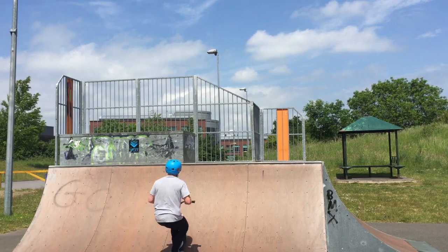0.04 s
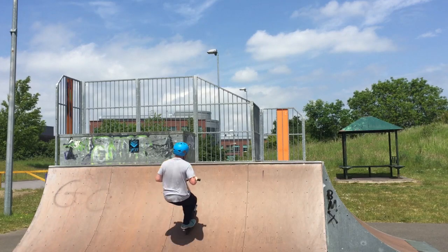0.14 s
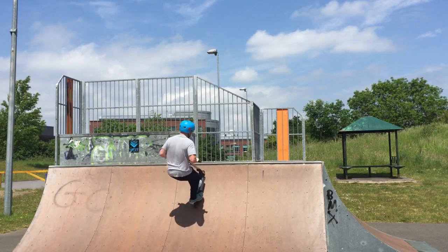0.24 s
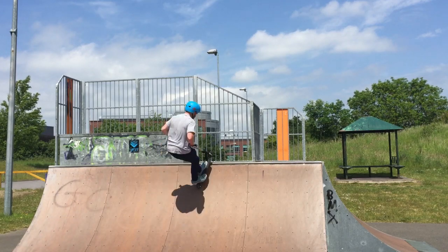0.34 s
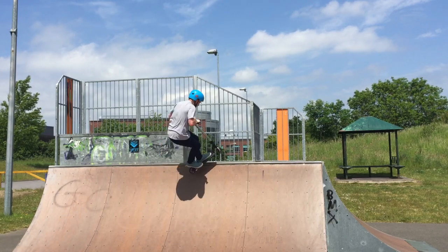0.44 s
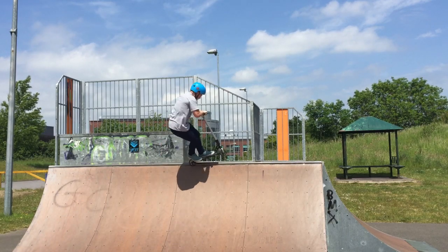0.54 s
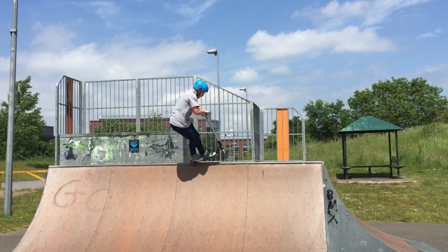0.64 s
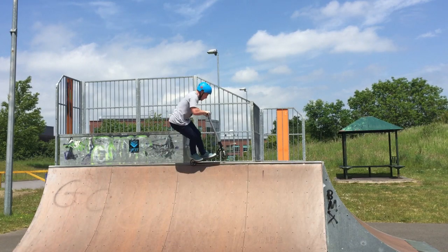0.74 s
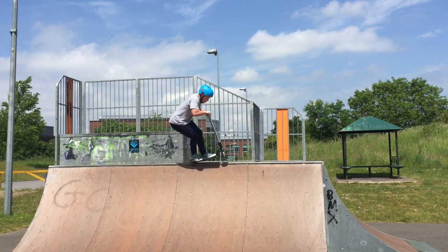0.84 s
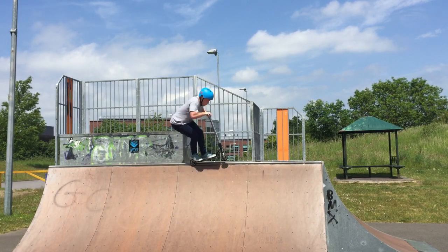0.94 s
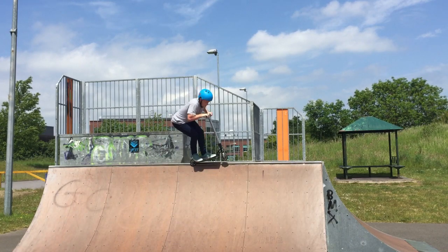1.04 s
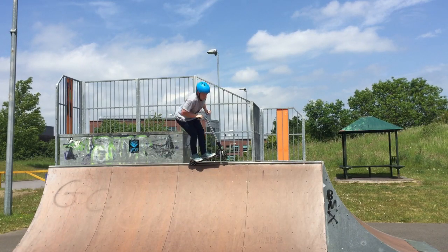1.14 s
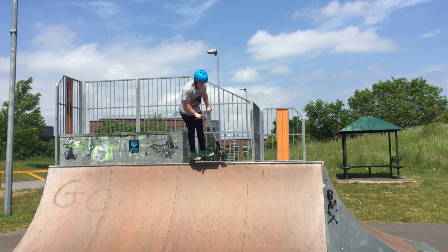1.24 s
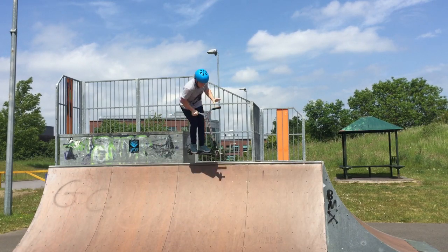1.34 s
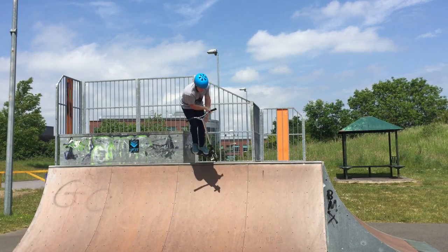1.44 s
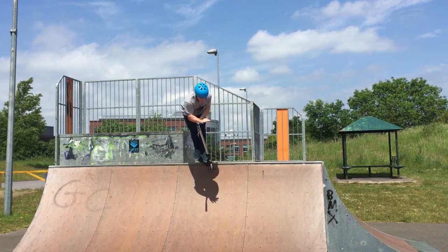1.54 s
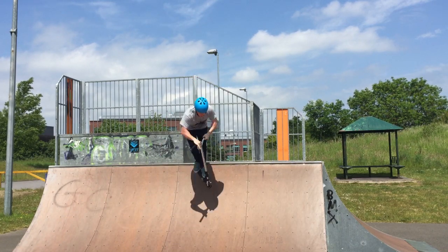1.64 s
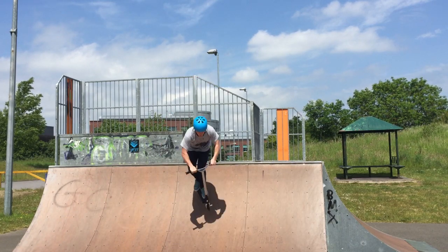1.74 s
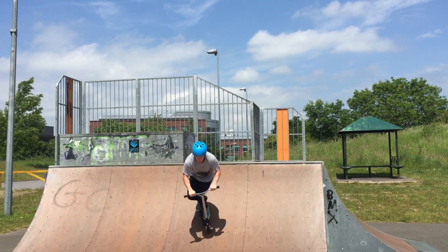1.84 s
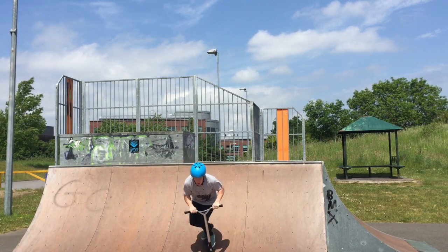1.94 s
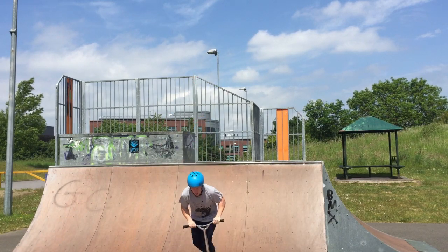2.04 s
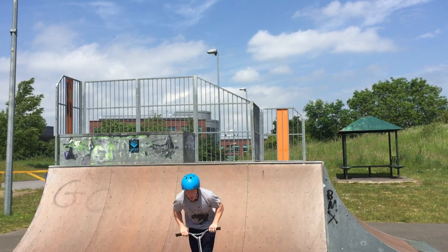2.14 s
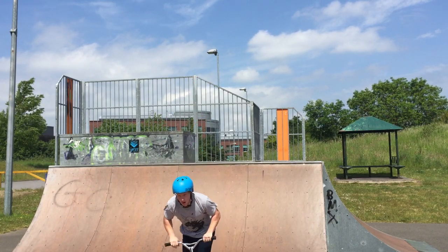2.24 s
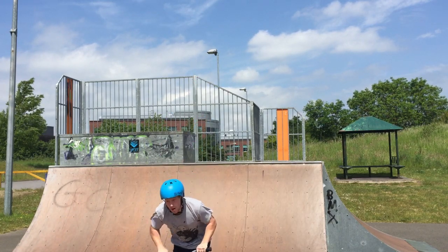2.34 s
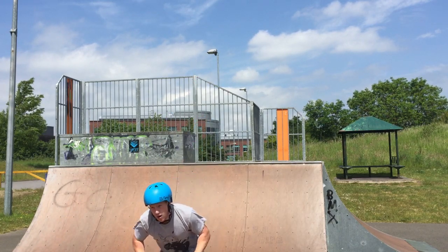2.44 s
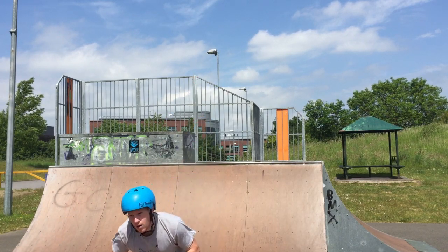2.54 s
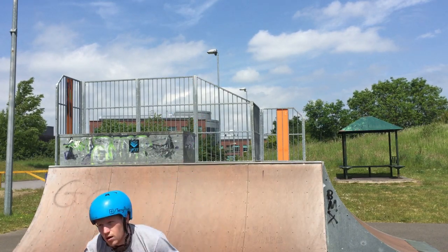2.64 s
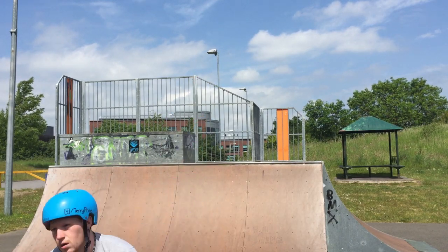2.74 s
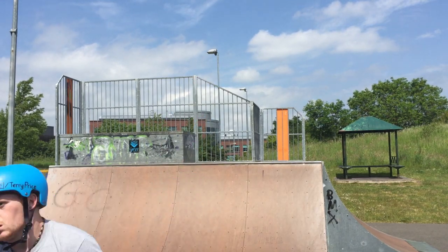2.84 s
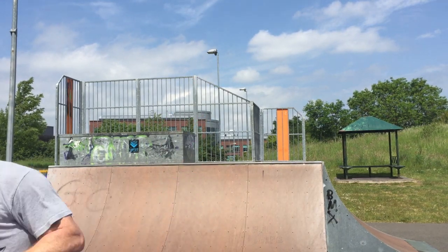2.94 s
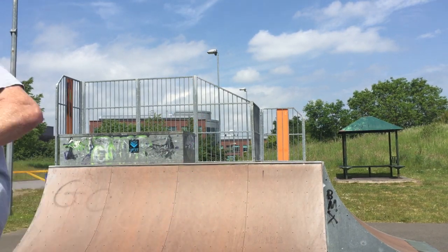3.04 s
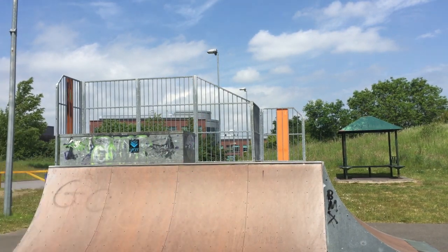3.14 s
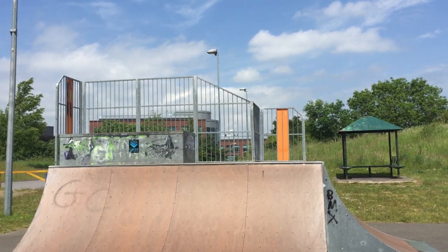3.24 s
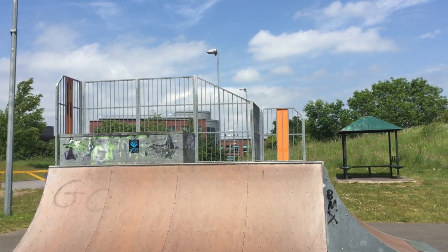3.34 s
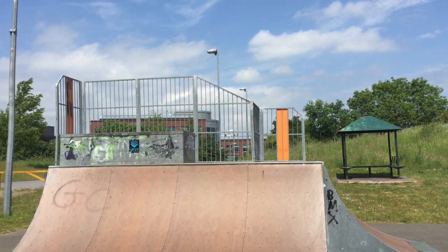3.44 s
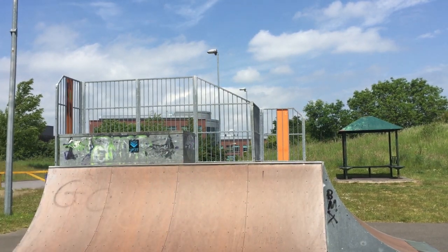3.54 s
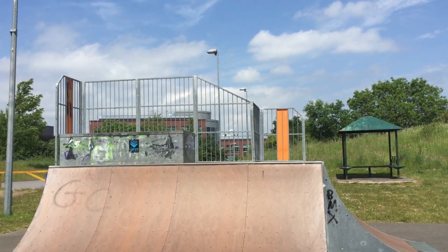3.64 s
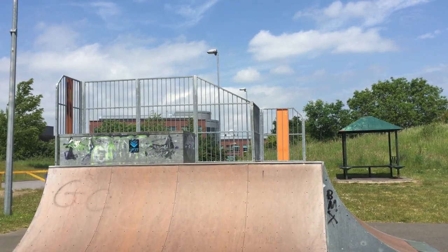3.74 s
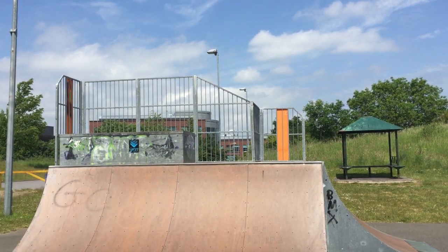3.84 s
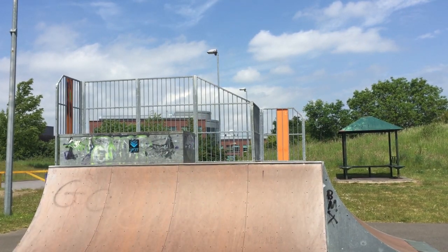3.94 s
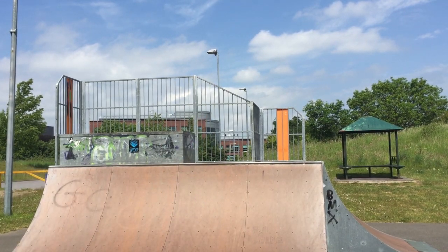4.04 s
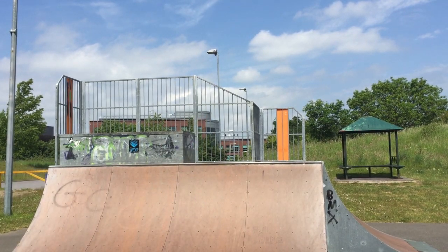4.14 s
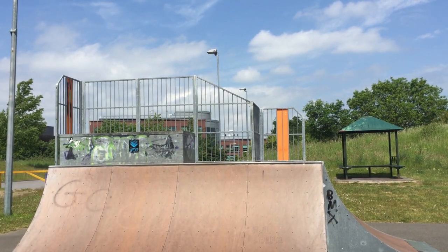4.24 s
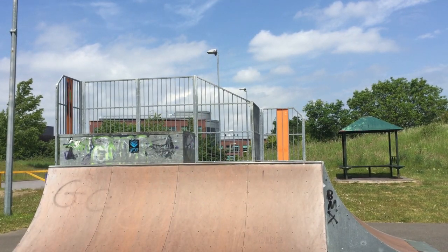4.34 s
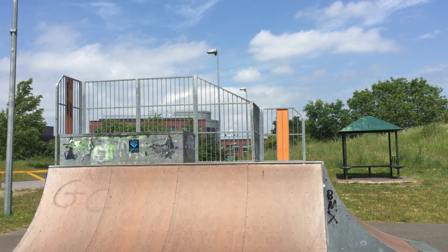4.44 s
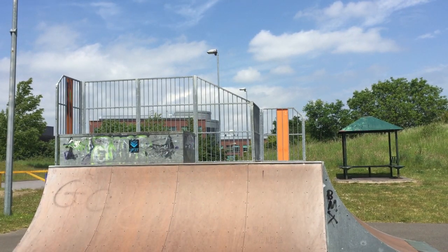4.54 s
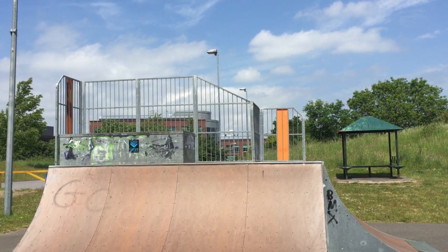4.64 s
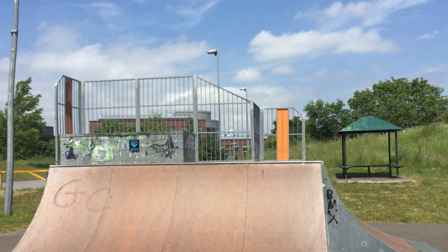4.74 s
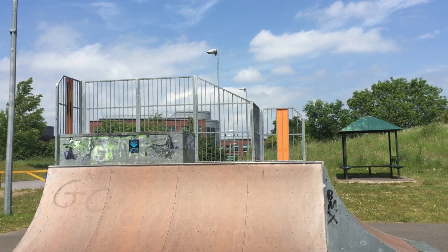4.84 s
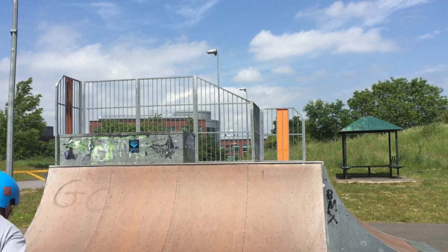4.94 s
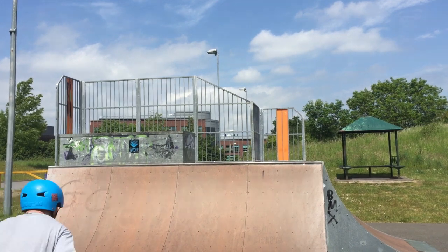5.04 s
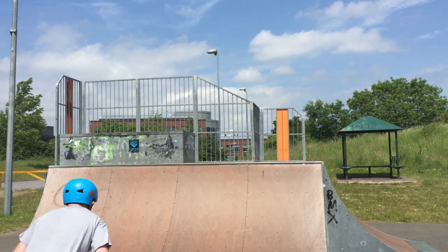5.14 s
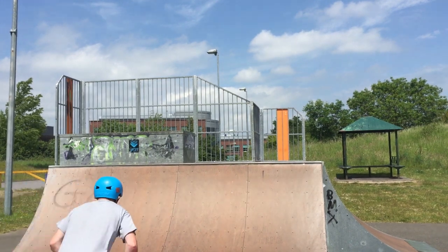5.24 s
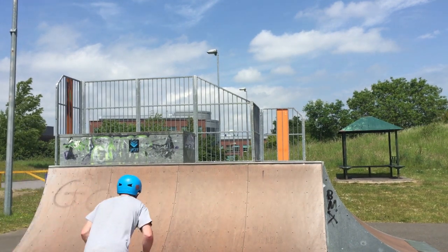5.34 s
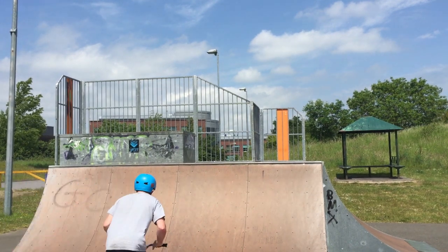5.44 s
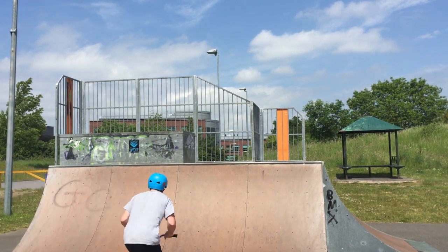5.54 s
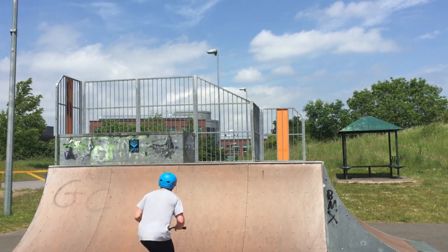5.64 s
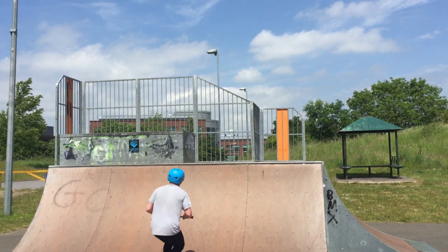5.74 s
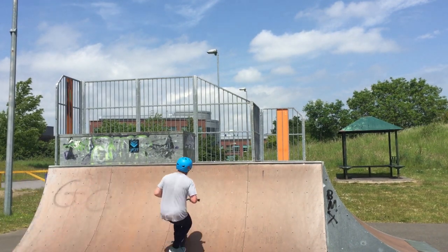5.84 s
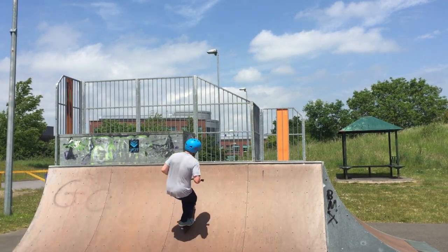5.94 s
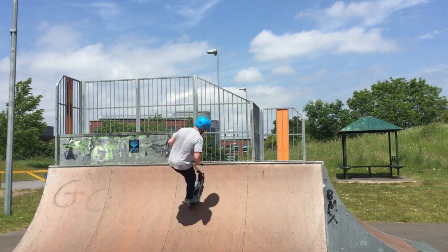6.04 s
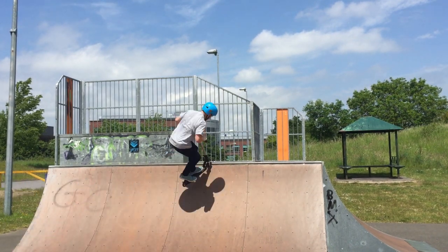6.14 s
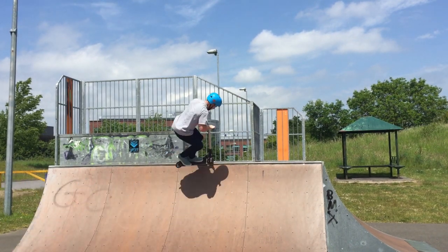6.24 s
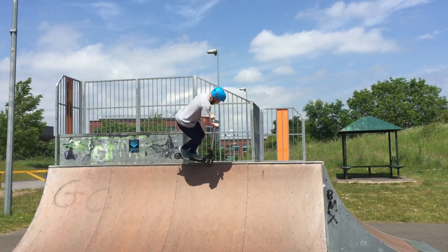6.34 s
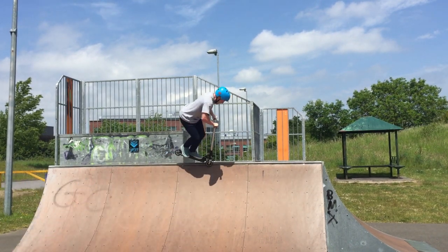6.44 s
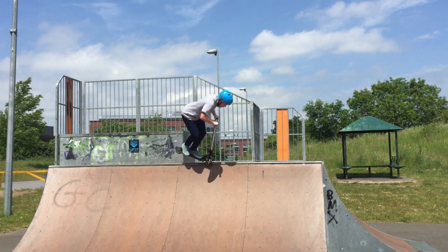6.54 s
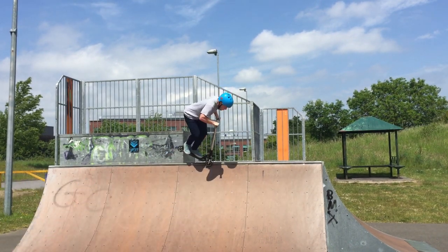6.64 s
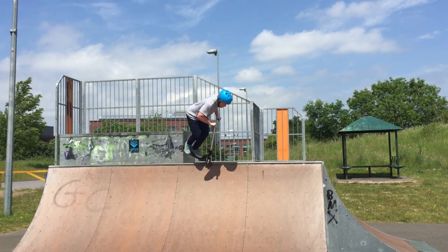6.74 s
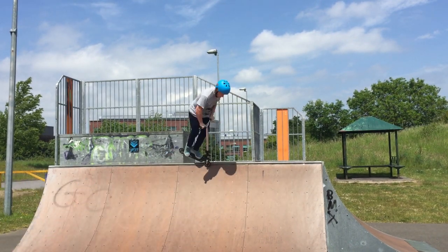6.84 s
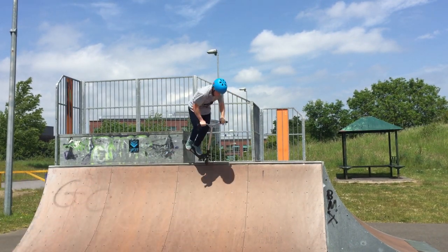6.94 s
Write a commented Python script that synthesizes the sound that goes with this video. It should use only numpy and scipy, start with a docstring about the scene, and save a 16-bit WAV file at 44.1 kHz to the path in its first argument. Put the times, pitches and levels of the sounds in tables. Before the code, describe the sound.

Hard little wheels drone over hollow panels, then a sharp clack catches the steel edge with a brief thin ring. A double low thump marks the drop, and rolling swells right beside a fixed microphone. Next comes the loudest hit, a dry metallic crack with a squeak, then faint scuffs, a booming landing, another crunchy pass and a last knock on the edge. Dry outdoor space, light wind, far road.

```python
"""A stunt scooter rides up a hollow ramp, clacks onto its top edge, drops back and rolls close past the
microphone; it then lands hard on a second ramp, comes back past and strikes the first edge again.
Blows are decaying noise bursts and ringing modes of panels, deck and steel edge; wheels are coloured noise
that swells with nearness. Throughout, a road hums far away and a light wind rumbles."""
import sys
import numpy as np
from scipy import signal
from scipy.fft import rfft, irfft, next_fast_len
from scipy.io import wavfile
from scipy.ndimage import uniform_filter1d, minimum_filter1d, map_coordinates

SR = 44100
rng = np.random.default_rng(int(sys.argv[2]) if len(sys.argv) > 2 else 0)


def generate_wav(sig):
    """Save sig (samples, or channels by samples) to the path in sys.argv[1] as 16-bit PCM at SR."""
    pcm = np.round(np.clip(np.atleast_2d(sig).T, -1, 1) * 32767).astype(np.int16)
    wavfile.write(sys.argv[1], SR, pcm)


N = 308700  # samples, 7 s


def amp(db):
    """Logarithmic level: decibels become an amplitude ratio."""
    return 10 ** (np.asarray(db) / 20)


def unit(x):
    """Normalisation: scale to an rms of 1."""
    return x / np.sqrt(np.mean(x ** 2) + 1e-20)


def clock(seconds):
    """Sampling: the times in seconds of a sound of this length."""
    return np.arange(round(seconds * SR)) / SR


def add(track, start_s, sound):
    """Superposition: mix a sound into the track from its start time."""
    part = track[max(round(start_s * SR), 0):][:len(sound)]
    part += sound[:len(part)]


def fade(t, t60):
    """Exponential damping: amplitude falls by 60 dB in t60 seconds (at least 1 ms)."""
    return np.exp(-np.log(1000) * t / max(t60, 1e-3))


def along(points, hz):
    """Spectral envelope: interpolate (Hz, value) points on a log-frequency axis."""
    f, v = np.transpose(points)
    return np.interp(np.log(hz + 1), np.log(f + 1), v)


def bump(hz, centre_hz, octaves):
    """Resonance curve: a Gaussian bell of height 1 on the log-frequency axis."""
    return np.exp(-.5 * (np.log2((hz + 1) / centre_hz) / octaves) ** 2)


def treble(hz):
    """Shelving curve: rises from 0 at 2.5 kHz to 1 at 10 kHz."""
    return along([(2500, 0), (10000, 1)], hz)


def coloured(x, gain_db):
    """Minimum-phase filtering: the folded cepstrum of a gain curve in dB gives a causal filter."""
    m = 2 * next_fast_len(len(x) // 2 + 4096)
    gain = amp(gain_db(np.fft.rfftfreq(m, 1 / SR)))
    cepstrum = irfft(np.log(gain + 1e-6))
    cepstrum[1:m // 2] *= 2
    cepstrum[m // 2 + 1:] = 0
    response = np.exp(rfft(cepstrum))
    return irfft(rfft(x, m) * response)[:len(x)]


def wobble(rate):
    """Slow random modulation: a smooth curve through 'rate' random knots a second."""
    knots = rng.standard_normal(int(N * rate / SR) + 4)
    return map_coordinates(knots, [np.arange(N) * rate / SR])


def rush(spectrum, spiky_db):
    """Shot noise: countless tiny impacts, their sizes scattered by spiky_db, merge into noise of rms 1."""
    impacts = rng.standard_normal(N) * amp(spiky_db * wobble(900))
    return unit(coloured(impacts, lambda hz: along(spectrum, hz)))


def burst(envelope, smoothing_bins=160):
    """Spectral whitening: noise under an envelope, its energy evened out over the bands."""
    z = rfft(rng.standard_normal(len(envelope)) * envelope, 2 * len(envelope))
    power = abs(uniform_filter1d(abs(z) ** 2, smoothing_bins)) + 1e-12
    return irfft(z / np.sqrt(power))[:len(envelope)]


def patchy(x, depth_db, bands=5, frames=14):
    """Time-frequency modulation: patches of the spectrum grow stronger and weaker at random."""
    z = signal.stft(x, nperseg=256)[2]
    field = uniform_filter1d(rng.standard_normal(z.shape), bands, 0)
    field = uniform_filter1d(field, frames, 1)
    return unit(signal.istft(z * amp(depth_db * unit(field)), nperseg=256)[1][:N])


# Metal and hard wheels striking. Each row: start in seconds, relative level in dB, centre in Hz,
# emphasis at that centre in dB, treble shelf in dB, crack t60 in seconds, relative deck ring in dB.
CLACK_HITS = [(0.7131, -8.5, 3000, -3.5, -7.5, .045, -14), (0.7365, -15.5, 785, 13, -6, 0.059, -23),
              (1.929, -18, 744, 23, -16.5, 0.021, -25), (1.9877, -18, 980, 24, -27, 0.015, -28),
              (1.9996, -16.5, 1040, 20, -37, 0.016, -35), (3.5435, -5, 5290, 18.5, 1, 0.0047, -22.5),
              (3.5651, -8.5, 1100, 0.5, -7, 0.015, -23.5), (3.6112, 6, 2217, 4.5, 1.5, 0.018, -26),
              (3.659, -27.5, 5500, 7, -3, 0.027, -27), (5.093, -25, 2800, 6, -9.5, 0.011, -29),
              (6.5137, -19.5, 1110, 16, -18, 0.047, -27), (6.5212, -17.5, 4000, 12.5, 0, .03, -30)]
# Modes of the scooter's deck and fork. Each row: frequency in Hz, mean level in dB, t60 in seconds.
DECK_MODES = [(903, -6, 0.071), (1046, -13, .04), (1480, -8.5, .035), (1610, -2, 0.069), (2360, -7, .035),
              (2434, 1, 0.049), (2660, 5, .035), (2860, 2.5, .04), (3360, 1, .045), (4410, -10.5, .04),
              (4595, -12.5, 0.013), (5240, -9.5, 0.013), (5660, -6, 0.053), (8500, -16, .07)]
# Spectrum of a hard crack. Each row: frequency in Hz, relative level in dB per Hz.
CRACK_SPECTRUM = [(200, -22.5), (500, -4), (700, -6), (1150, -2), (1650, -1.5), (2050, -0.5), (2650, -0.5),
                  (3500, -3.5), (4000, -3), (5600, -6), (7500, -14.5), (10200, -14), (12500, -17),
                  (15500, -26)]


def clacks(hold_s=0.0034, rattle_db=-26, rattle_t60=.13, ring_db=-18, level_db=-9):
    """Impact excitation: metal chatters for milliseconds and rings the deck; the contact point colours it."""
    out, t = np.zeros(N), clock(.25)
    for start, db, centre_hz, focus_db, treble_db, t60, deck_db in CLACK_HITS:
        envelope = fade(np.maximum(t - hold_s, 0), t60) + amp(rattle_db) * fade(t, rattle_t60)
        crack = coloured(burst(envelope), lambda hz: along(CRACK_SPECTRUM, hz))
        ring = np.zeros(len(t))
        for hz, mode_db, life in DECK_MODES:
            gain = amp(mode_db + rng.normal(0, 1))  # modes vary by about 1 dB
            ring += gain * fade(t, life) * np.sin(2 * np.pi * (hz * t + rng.random()))
        hit = coloured(crack + amp(deck_db + ring_db) * ring,
                       lambda hz: focus_db * bump(hz, centre_hz, 0.54) + treble_db * treble(hz))
        onset_rms = np.std(hit[:SR // 200])  # first 5 ms
        add(out, start, amp(db + level_db) * hit / onset_rms)
    return out


# The rider's weight hitting the panels. Each row: start in seconds, peak of the boom in dB, centre in Hz,
# peak of the tyre slap in dB relative to the boom.
WEIGHT_BLOWS = [(0.14, -19, 282, -13), (0.168, -18.5, 70, -20), (0.269, -27.5, 310, -15.5),
                (0.455, -17.5, 90, -15.5), (0.716, -22, 120, 2.5), (1.029, -28, 130, -3),
                (1.579, -27, 270, -10), (1.928, -6.5, 188, -15), (1.975, -3, 90, -21), (2.0, -12, 65, -6),
                (2.238, -22.5, 332, -10), (2.314, -22.5, 219, -10), (2.746, -24.5, 208, -14.5),
                (2.908, -21, 146, 0), (3.021, -15.5, 71, -14.5), (3.267, -17, 171, -28.5),
                (3.54, -7, 135, -1), (3.564, -10.5, 60, -3), (3.613, -6.5, 398, -6),
                (3.621, -14, 160.6, -14.5), (4.793, -6, 110, -19.5), (4.828, -6.5, 66, -39.5),
                (5.087, -15, 126, -8), (5.158, -19.5, 390, -3), (5.728, -25, 206, -21.5),
                (5.94, -24, 85, -25), (6.414, -19, 124, -28), (6.523, -11.5, 65, -17),
                (6.527, -11, 128, -19.5), (6.531, -21.5, 480, -14)]
# Modes of the hollow ramp. Each row: mean frequency in Hz, mean level in dB,
# t60 in seconds before each blow shortens it by a tenth.
RAMP_MODES = [(53.7, 1, 0.37), (82.6, -4, .25), (105, 2.5, 0.23), (122.3, -5, 0.15), (143, -1.5, 0.17),
              (165.8, -2, 0.28), (202.8, -6.5, 0.2), (230.8, -1, 0.087), (287.4, -2.5, 0.066),
              (391, -8, 0.13), (438, -9.5, 0.1), (526, -8.5, 0.057), (654, -10.5, 0.1)]
# Spectrum of dull drones and slaps. Each row: frequency in Hz, relative level in dB per Hz.
DRONE_SPECTRUM = [(90, -19), (190, 1), (290, -1), (450, -6.5), (700, -11.5), (1300, -15), (2500, -26),
                  (5000, -54)]


def thumps(focus_db=17, attack_s=.0015, ring_share=0.9):
    """Modal excitation: a blow drives most the panel modes near its centre, and the tyre slaps dully."""
    out, t = np.zeros(N), clock(.5)
    for start, db, centre_hz, slap_db in WEIGHT_BLOWS:
        boom = np.zeros(len(t))
        for k, (hz, mode_db, t60) in enumerate(RAMP_MODES):
            gain = amp(mode_db + focus_db * bump(hz, centre_hz, 0.5) + rng.normal(0, 1))
            detuned_hz = hz * (1 + rng.normal(0, 0.028))
            polarity = (-1) ** k
            boom += polarity * gain * fade(t, t60 * ring_share) * np.sin(2 * np.pi * detuned_hz * t)
        boom *= 1 - np.exp(-t / attack_s)
        slap = rng.standard_normal(len(t)) * fade(t, 0.12)
        slap = coloured(slap, lambda hz: along(DRONE_SPECTRUM, hz))
        blow = boom / abs(boom).max() + amp(slap_db) * slap / abs(slap).max()
        add(out, start, amp(db) * blow)
    return out


# Small hard ticks of the wheels and the loose headset. Each row: start in seconds, relative level in dB,
# centre in Hz, treble shelf in dB.
TICK_HITS = [(0.019, -44, 7000, 17), (0.105, -42, 5500, 12), (1.580, -48, 11000, -1),
             (2.790, -23, 3770, -14), (2.820, -13, 5100, 4), (2.876, -19.5, 4200, -9),
             (2.903, -17, 5200, 0.5), (3.115, -36, 4530, -2), (3.342, -45, 12300, 23),
             (5.062, -33, 2500, 10)]


def ticks(focus_db=7, t60=0.0064, tail_db=-26, tail_t60=0.091, level_db=-7):
    """Heavy damping: short dry snaps die in milliseconds, leaving a faint rattle."""
    out, t = np.zeros(N), clock(.1)
    for start, db, centre_hz, treble_db in TICK_HITS:
        snap = rng.standard_normal(len(t)) * (fade(t, t60) + amp(tail_db) * fade(t, tail_t60))
        snap = coloured(snap, lambda hz: along(CRACK_SPECTRUM, hz)
                        + focus_db * bump(hz, centre_hz, 0.23) + treble_db * treble(hz))
        onset_rms = np.std(snap[:SR // 500])  # first 2 ms
        add(out, start, amp(db + level_db) * snap / onset_rms)
    return out


# Modes of the steel pipe along the ramp's edge. Each row: frequency in Hz, relative level in dB,
# t60 in seconds.
PIPE_MODES = [(3160, -20, 0.52), (3540, -3, 0.27), (3600, 2, .08), (10100, -13, 0.088)]
# Blows that catch the pipe. Each row: start in seconds, level in dB.
PIPE_HITS = [(0.714, -35.5), (6.524, -33.5)]


def coping():
    """Free vibration: the lightly damped steel edge sings on after the scooter catches it."""
    out, t = np.zeros(N), clock(.5)
    for start, db in PIPE_HITS:
        for hz, mode_db, t60 in PIPE_MODES:
            add(out, start, amp(db + mode_db) * fade(t, t60) * np.sin(2 * np.pi * hz * t))
    return out


# Runs across the park. Each row: touch-down in seconds, lift-off in seconds, moment nearest the microphone
# in seconds, distance then in metres, relative level there in dB.
RUNS = [(-0.2, 0.52, 0.052, 0.83, -6.5), (1.95, 3.233, 2.948, 0.53, 1.5), (4.852, 6.139, 5.12, 0.42, -0.5)]
SPEED_M_PER_S, CONTACT_S = 5.2, .09  # riding speed; time for the tyres to take or shed the load


def riding(carry_db, lag_s=0):
    """Inverse-distance law: rolling gain falls with distance, to a floor the ramps carry all along the run."""
    t, gain = np.arange(N) / SR - lag_s, np.zeros(N)
    for down, off, nearest, metres, db in RUNS:
        contact = np.clip(np.minimum(t - down, off - t) / CONTACT_S + .5, 0, 1)
        closeness = metres / np.hypot(metres, SPEED_M_PER_S * (t - nearest))
        gain += amp(db) * contact * np.maximum(closeness, amp(carry_db))
    return gain


# Spectra of deep rumble and of grit under the tyres. Each row: frequency in Hz, relative level in dB per Hz.
RUMBLE_SPECTRUM = [(20, -28), (33, -20.5), (48, -2.5), (62, 5), (90, -2), (140, -7), (200, -13), (400, -44),
                   (1000, -79)]
GRIT_SPECTRUM = [(600, -16), (1800, 14.5), (3200, 13), (4500, 10), (6500, 0), (9000, -15.5), (12000, -27),
                 (16000, -26.5)]


def wheels(rumble_db=-27, drone_db=-32.5, grit_db=-53, crunch_db=-59, hollow_db=5, grit_power=1.1):
    """Roughness excitation: uneven ground shakes panels and tyres; grit brightens to a crunch close by."""
    bumps_db = 1.9 * wobble(30)
    rumble = riding(carry_db=-12, lag_s=0.13) * rush(RUMBLE_SPECTRUM, spiky_db=2)

    def panels(hz):
        """Resonant filtering: the ramp's modes colour the drone of the tyres."""
        return hollow_db * sum(bump(hz, mode[0], .05) for mode in RAMP_MODES)

    tyres = unit(coloured(rush(DRONE_SPECTRUM, spiky_db=3.8), panels))
    drone = riding(carry_db=-10) * tyres
    crackle = patchy(rush(GRIT_SPECTRUM, spiky_db=3.2), depth_db=2.2)
    grit = riding(carry_db=-13.5) ** grit_power * crackle
    bright = unit(coloured(crackle, lambda hz: 32 * treble(hz)))
    crunch = riding(carry_db=-20) ** 2 * bright  # squared: fades faster with distance
    low = amp(rumble_db + bumps_db / 2) * rumble + amp(drone_db + bumps_db) * drone
    return low + amp(grit_db + bumps_db / 2) * grit + amp(crunch_db + bumps_db / 2) * crunch


# The ramp's curve loading the bearings. Each row: time of the height in seconds, level in dB,
# build-up in seconds.
CURVE_LOADS = [(0.31, -70, 0.16), (6.03, -70, 0.16)]
UNLOAD_S = 0.098  # the hiss dies as the wheels reach the top
# Spectrum of the bearings. Each row: frequency in Hz, relative level in dB per Hz.
FIZZ_SPECTRUM = [(4000, -31), (7000, 0), (10500, -3), (12500, 4.5), (15000, 2), (16000, -20)]


def bearings(near_db=-75, near_power=1.9, flutter_db=3.0):
    """Friction noise: a fine fizz, heard close by and when the scooter presses into the ramp's curve."""
    t = np.arange(N) / SR
    gain = amp(near_db) * riding(carry_db=-22) ** near_power
    for height_s, db, build_up in CURVE_LOADS:
        width = np.where(t < height_s, build_up, UNLOAD_S)
        gain += amp(db) * np.exp(-((t - height_s) / width) ** 2)
    return gain * amp(flutter_db * wobble(45)) * rush(FIZZ_SPECTRUM, spiky_db=3.5)


# Tyres scrubbing sideways. Each row: time of the height in seconds, level in dB, centre in Hz,
# time from the height to 1/e in seconds, relative bandwidth in octaves.
TYRE_SLIPS = [(0.466, -67, 6000, 0.0099, .73), (1.659, -53, 5500, .015, 1), (2.18, -66.5, 5150, 0.13, 0.28),
              (2.627, -64, 4400, 0.025, .1), (3.6097, -23, 2620, .0086, 0.094),
              (3.905, -66.5, 8000, 0.019, 0.33), (4.106, -70, 6970, .03, 0.734),
              (4.50, -63, 4480, .035, 0.71)]


def scuffs():
    """Sliding friction: a slipping tyre swells and stops; a wide band is a scrub, a narrow one a squeak."""
    out, t = np.zeros(N), clock(.5)
    middle = t.mean()
    for height_s, db, centre_hz, length, octaves in TYRE_SLIPS:
        slip = coloured(rng.standard_normal(len(t)), lambda hz: 55 * bump(hz, centre_hz, 2.6 * octaves))
        swell = np.exp(-((t - middle) / length) ** 2)
        add(out, height_s - middle, amp(db) * unit(slip) * swell)
    return out


def rattle(count=60, level_db=-67, near_db=16, scatter_db=4, t60=0.014, treble_db=10):
    """Random impacts: loose parts tick faintly at chance moments, louder as the scooter rolls near."""
    out, t, near = np.zeros(N), clock(.05), riding(carry_db=-20)
    for place in rng.integers(N, size=count):
        db = level_db + near_db * near[place] + scatter_db * rng.standard_normal()
        add(out, place / SR, amp(db) * fade(t, t60) * rng.standard_normal(len(t)))
    return coloured(out, lambda hz: along(CRACK_SPECTRUM, hz) + treble_db * treble(hz))


# Spectrum of distant tyres. Each row: frequency in Hz, relative level in dB per Hz.
TRAFFIC_SPECTRUM = [(100, -16), (300, -6), (480, -7), (700, -4), (950, 3), (1400, -6), (2000, -11.5),
                    (2600, -20.5), (3100, -30), (4000, -38), (6000, -51.5)]


def road(hum_db=-41.5, drone_db=-51):
    """Incoherent summation: distant tyres merge into a hum near one kilohertz, over a low engine drone."""
    hum = amp(hum_db + .3 * wobble(4)) * rush(TRAFFIC_SPECTRUM, spiky_db=.2)
    drone = amp(drone_db + 0.55 * wobble(7)) * rush(DRONE_SPECTRUM, spiky_db=2.9)
    return hum + drone


# Spectrum of the open air's faint hiss. Each row: frequency in Hz, relative level in dB per Hz.
AIR_SPECTRUM = [(2060, -25), (3500, -2), (4840, -15), (5580, -8.5), (10700, -25), (13300, -20.5),
                (15500, -26)]


def breeze(rumble_db=-35.0, gust_db=2.96, hiss_db=-73):
    """Turbulence noise: light wind rumbles in gusts at the microphone, under a faint even hiss."""
    rumble = amp(rumble_db + gust_db * wobble(2.4)) * rush(RUMBLE_SPECTRUM, spiky_db=0.5)
    return rumble + amp(hiss_db) * rush(AIR_SPECTRUM, spiky_db=1.0)


def grounded(x, delay_s=.00115, bounce_db=-13):
    """Comb filtering: a sharp sound arrives directly and off the ground, which ripples its colour."""
    hz = np.fft.rfftfreq(N, 1 / SR)
    bounce = amp(bounce_db) * np.exp(-2j * np.pi * hz * delay_s)
    return irfft(rfft(x) * (1 + bounce), N)


def park(x, t60=0.37, echo_db=-32):
    """Diffuse reflection: ramps and fences scatter back a thin, dull tail after 8 ms."""
    t = clock(.5)
    tail = rng.standard_normal(len(t)) * fade(t, t60) * (t > .008)
    dulling = [(1500, 0.5), (2600, 0.5), (6000, 0.0), (15000, -17)]  # (Hz, dB)
    tail = coloured(tail, lambda hz: along(dulling, hz))
    return x + amp(echo_db) * signal.fftconvolve(x, tail / np.linalg.norm(tail))[:N]


def scene():
    """Superposition: blows in the open air, over the rolling, the road and the breeze."""
    sharp = grounded(clacks() + ticks())
    blows = park(sharp + rattle() + thumps() + scuffs()) + coping()
    return (blows + wheels() + bearings() + road() + breeze())[None]


def gain_control(x, knee_db=-18, recovery_s=0.17):
    """Dynamic compression: smoothed power lowers the gain after loud blows, and it creeps back."""
    keep = np.exp(-1 / (recovery_s * SR))
    power = signal.lfilter([1 - keep], [1, -keep], x ** 2)
    return x / np.sqrt(1 + power / amp(knee_db) ** 2)


def record(dry, low_hz=42, top_hz=15400, ceiling=.74):
    """Band and level limiting: deep bass is shed, gain ducks, cracks are held, the top ends steeply."""
    thin = signal.sosfilt(signal.butter(3, low_hz, "highpass", fs=SR, output="sos"), dry)
    ducked = gain_control(thin)
    needed = ceiling / np.maximum(abs(ducked), ceiling)
    gain = uniform_filter1d(minimum_filter1d(needed, size=21), size=21)  # about half a millisecond
    band_limit = signal.cheby1(10, .05, top_hz, fs=SR, output="sos")
    return signal.sosfiltfilt(band_limit, ducked * gain)


dry = scene()
out = record(dry)
generate_wav(out)
```